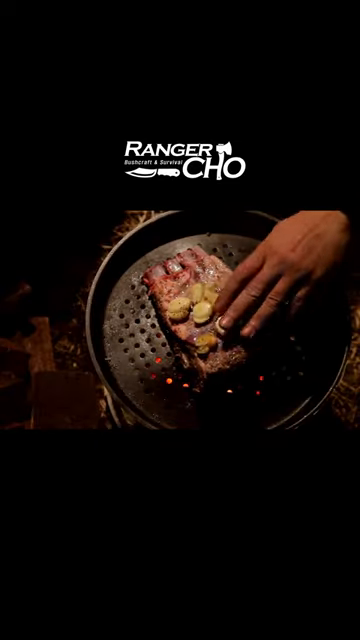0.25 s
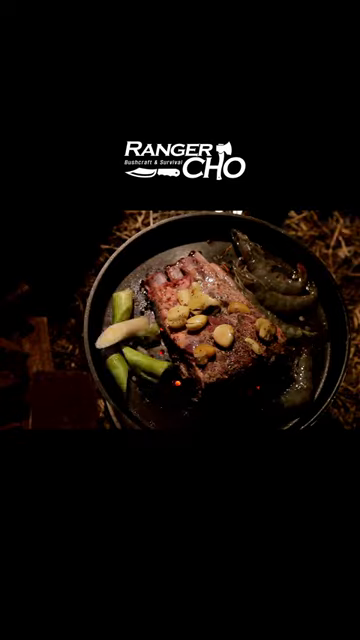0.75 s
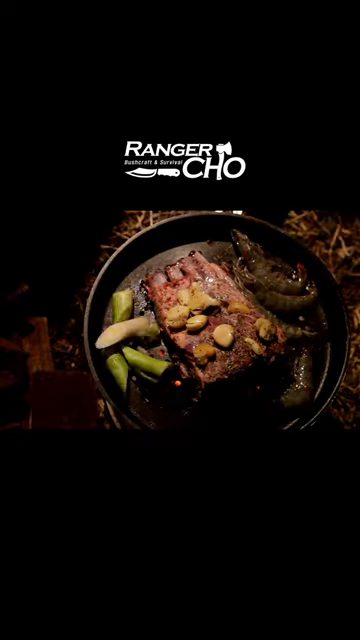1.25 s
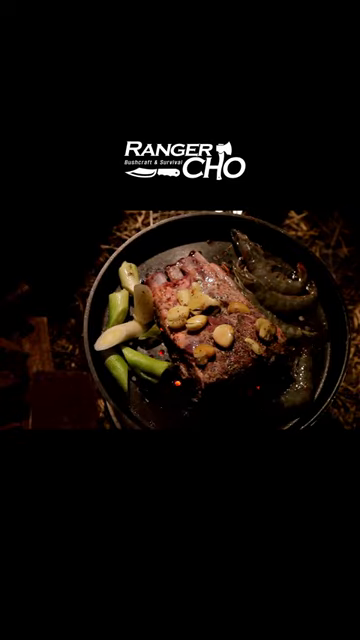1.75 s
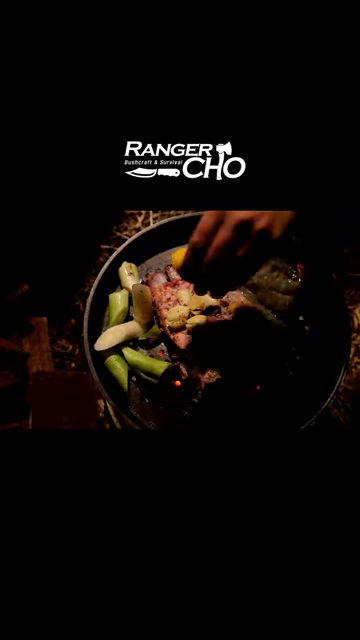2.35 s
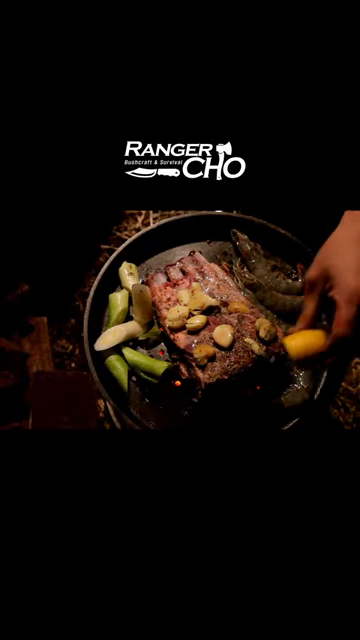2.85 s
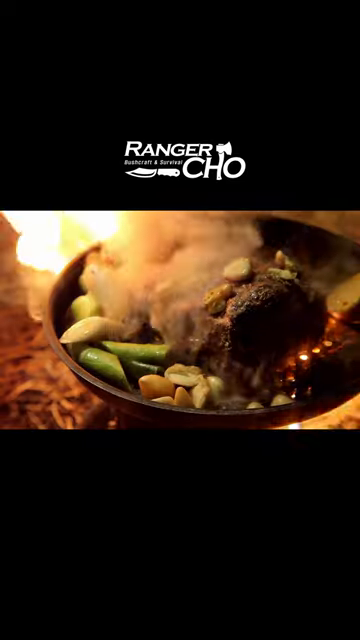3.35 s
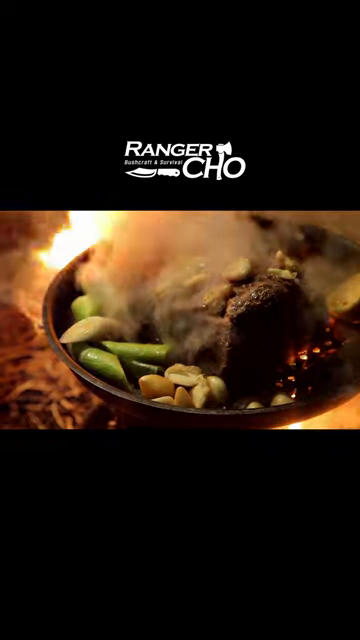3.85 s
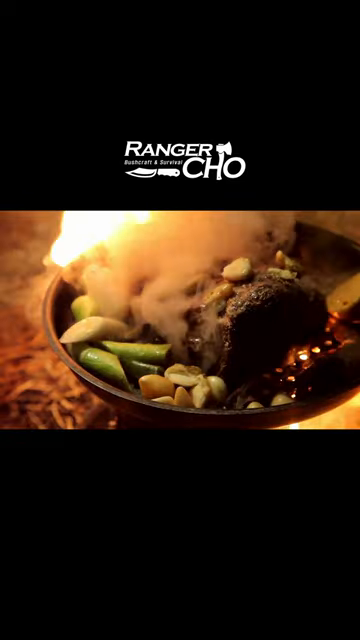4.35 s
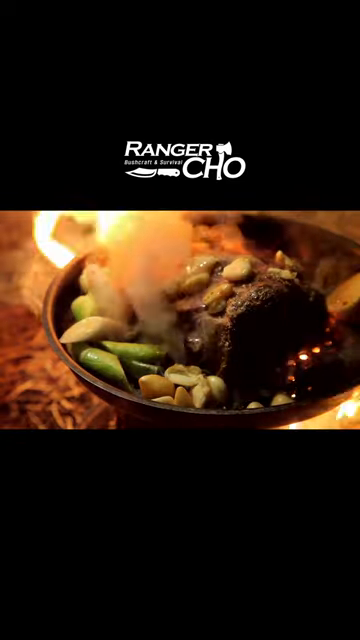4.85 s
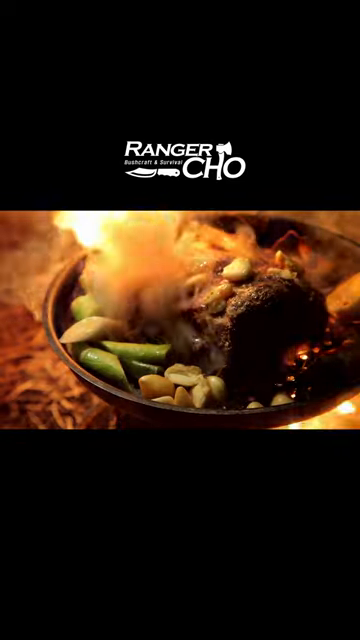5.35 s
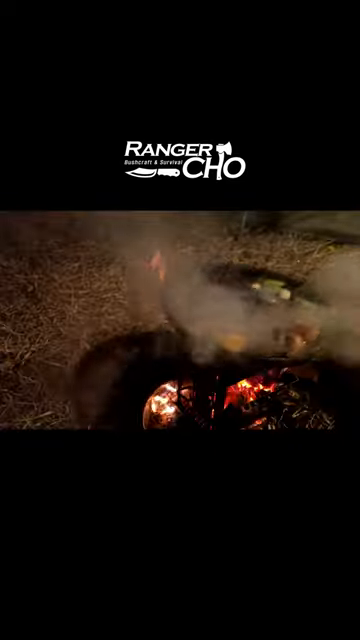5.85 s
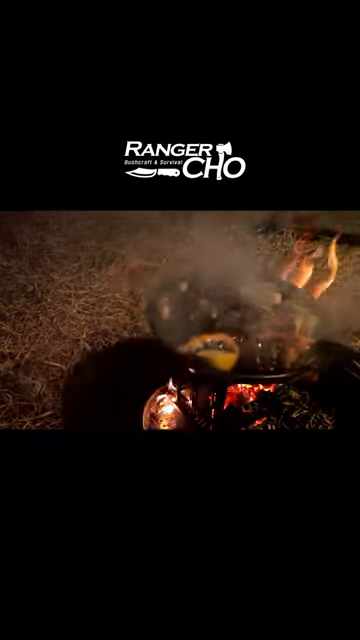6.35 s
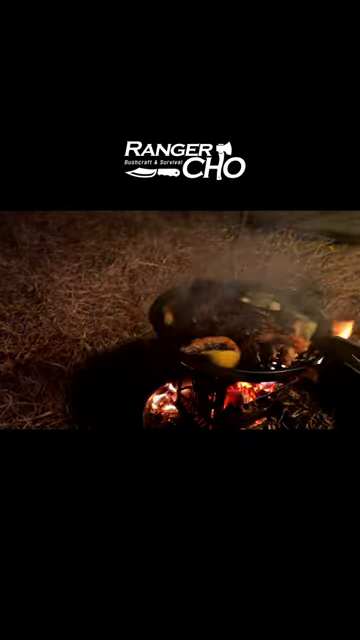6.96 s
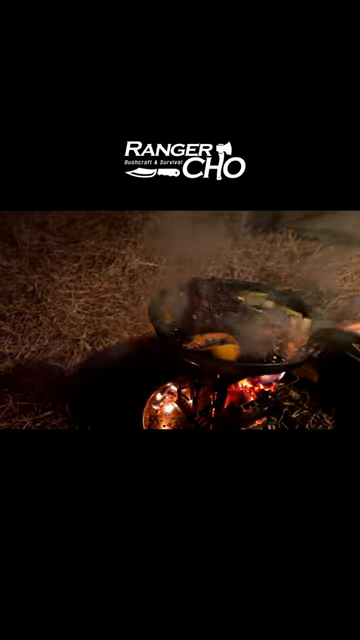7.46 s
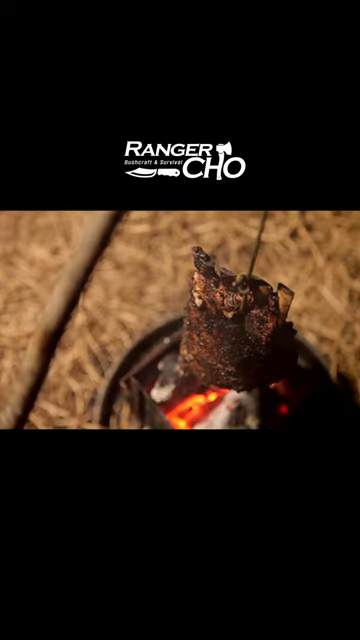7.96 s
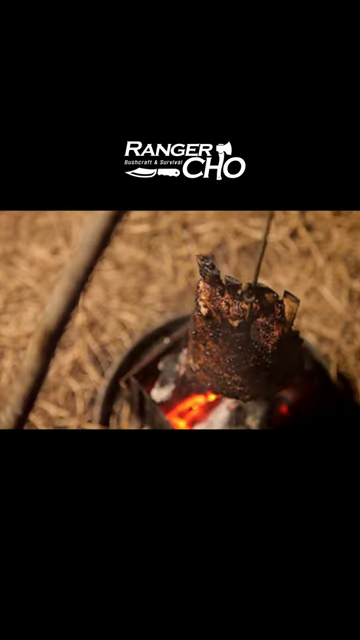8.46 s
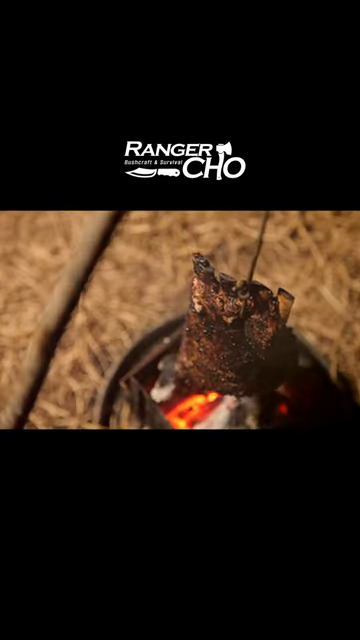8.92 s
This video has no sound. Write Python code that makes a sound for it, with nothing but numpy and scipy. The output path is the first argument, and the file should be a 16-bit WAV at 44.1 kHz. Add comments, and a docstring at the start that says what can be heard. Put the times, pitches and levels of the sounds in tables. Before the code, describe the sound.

Close, bright sizzling with pops of fat and fluttering flames, then a few metal pan knocks and a much fainter hiss.

```python
"""A close, bright sizzle: meat fries on a perforated grill pan over a camp fire at night. Five scenes follow
one another, the scene changing abruptly: two close fries, a flare-up, the pan lifted off and set back, a skewer
over embers. Bursting bubbles act as random impulses: fine ones fizz, larger ones spatter, and fat spits and
pops. Crackle excites the hollows under the pan; knocks and scrapes excite the pan's own modes. Beneath it all,
flames flutter over quiet night air and a faint chorus of insects."""
import sys
import numpy as np
from scipy import signal
from scipy.fft import rfft, irfft
from scipy.io import wavfile

SR = 44100
rng = np.random.default_rng(int(sys.argv[2]) if len(sys.argv) > 2 else 0)


def persist_wave(psi):
    """Save psi, clipped to +-1, as 16-bit WAV."""
    counts = np.round(np.clip(psi, -1, 1) * 32767).astype(np.int16)
    wavfile.write(sys.argv[1], SR, np.atleast_2d(counts).T)


N = 405279

# the five scenes: start_s, end_s
SCENES = [(0, .585), (.585, 3.187), (3.187, 5.79), (5.79, 7.69), (7.69, 9.19)]
# spectrum of the night air: frequency_hz, gain_db
NIGHT_SPECTRUM = [(12, -24), (20, -5), (59, 0), (141, -5), (431, -13.5), (1280, -13.5), (1390, -13),
                  (1510, -17.5), (2120, -21), (2430, -18), (3040, -21), (3400, -23), (3700, -22.5),
                  (15800, -25)]
# far insect chorus: pitch_hz, bandwidth_hz, level_db
INSECT_BANDS = [(2426, 60, -68), (3435, 140, -62)]
# spectrum of the faint hiss that differs between the channels: frequency_hz, gain_db
SIDE_HISS_SPECTRUM = [(18, -37), (30, -11), (209, 13), (1090, 1.5), (1420, -9.5), (5120, -17), (15800, -8)]
# spectrum of the flames: frequency_hz, gain_db
FLAME_SPECTRUM = [(24, -30), (40, 4), (178, 5.5), (286, -4.5), (406, -9.5), (599, -6.5), (1000, -13.5),
                  (1300, -51), (2200, -120)]
# flames licking up: time_s, level_db
FLARE_ENVELOPE = [(3.19, -52), (3.22, -38), (3.32, -43), (3.45, -44), (3.95, -51), (4.3, -50.5),
                  (4.82, -48), (5.26, -54), (5.64, -40), (5.8, -43), (5.9, -45), (6.1, -37), (6.29, -37.5),
                  (6.36, -41), (6.6, -42), (6.91, -43.5), (7.3, -46.5), (7.69, -47)]
# soft low puffs of gas catching and plops of fat: start_s, level_db, centre_hz
PUFFS = [(3.208, -19, 169), (3.213, -18, 437), (3.22, -14, 345), (3.254, -16, 361), (3.39, -28, 145),
         (4.293, -24, 388), (4.418, -26, 167), (4.765, -25, 245), (4.984, -25.5, 161), (5.161, -27, 363),
         (5.192, -26, 221), (5.324, -20, 327), (5.435, -23, 280), (5.473, -24, 317), (5.565, -23, 350),
         (5.597, -18, 315), (5.64, -19, 300), (5.73, -22, 200), (6.085, -27, 99.6), (6.114, -28.5, 105),
         (6.256, -21.5, 110), (6.295, -19, 142), (6.445, -19.5, 165), (6.717, -22, 260), (6.773, -20, 240),
         (7.556, -21.5, 262)]
# vibration modes of the pan: pitch_hz, gain_db, t60_s
PAN_MODES = [(640, -5, .05), (705, 0.1, .09), (850, -5, .05), (991, -3, .07), (1244, -5, .07),
             (1340, -6, .07), (1728, -14, .08), (2285, -10, .12), (2315, -6, .13), (2961, -12, .12)]
# pan against its stand: start_s, clunk_db, clunk_hz, crack_db, ring_db, ring_tilt_db_per_octave
KNOCKS = [(6.446, -8, 900, -13.5, -38, -8), (6.519, -13.5, 800, -26, -33, -1),
          (6.671, -16.5, 815, -45, -39, 1), (6.718, -12, 800, -40, -29, -2),
          (6.736, -7.5, 556, -45, -28, 3.5), (6.774, -14.5, 800, -40, -21, -7),
          (7.065, -27, 708, -23, -46, -5), (7.27, -28, 834, -21.5, -44, -7),
          (7.557, -17, 735, -7, -32, -0.5)]
# pan pushed into place, a jerk and a slide: start_s, length_s, level_db
SCRAPES = [(6.774, 0.019, -30.5), (6.8, 0.283, -38.5)]
# food pushed about on the pan: start_s, length_s, level_db
FOOD_SHIFTS = [(0.612, .015, -42), (0.645, 0.056, -42.5), (0.872, 0.035, -33.5), (0.92, 0.085, -40),
               (1.024, 0.021, -36.5)]
# resonances of the pan loaded with food: pitch_hz, bandwidth_hz, gain_db
LOADED_PAN_MODES = [(423, 73, 2.5), (680, 76, -1.5), (1270, 120, -1), (1850, 52, 0.5), (2100, 35, -1)]
# resonances of the hollows under the pan: pitch_hz, bandwidth_hz, gain_db
HOLLOW_MODES = [(182, 72, 0), (340, 210, 0), (910, 310, 2), (1575, 68, -2.5), (1970, 240, 1.5),
                (2980, 78, 5.5), (4170, 170, -2)]
# fits of sputtering as fat runs onto the coals: start_s, length_s, level_db
SPUTTERS = [(0.8, .3, -45), (2.55, 0.073, -43), (3.207, 0.034, -29), (3.28, 0.069, -27),
            (3.36, 0.066, -32.5), (4.16, 0.093, -38.5), (4.3, 0.12, -33.5), (4.45, .22, -34.5),
            (4.79, 0.078, -38.5), (5.04, 0.37, -41), (5.47, 0.11, -32), (5.6, .09, -29.5),
            (5.7, .085, -34.5), (6.45, 0.051, -43), (6.92, 0.17, -38), (7.1, 0.35, -46.5),
            (7.55, 0.04, -40)]
# dull spits and nudges of food: start_s, level_db, centre_hz
SPITS = [(0.078, -14, 926), (0.611, -22, 430), (0.645, -17, 2160), (0.813, -19, 3000), (0.873, -18, 406),
         (0.894, -16, 1700), (0.896, -18, 500), (1.027, -16.5, 550), (1.112, -14, 2790), (1.198, -14, 2840),
         (1.429, -11, 2610), (1.503, -17, 2640), (1.901, -13, 2900), (2.01, -11.5, 3050), (3.209, -18, 397),
         (3.229, -7.5, 1500), (3.259, -15, 533), (3.305, -9, 2300), (3.345, -8, 2600), (3.419, -4, 2200),
         (3.621, -15, 1890), (3.671, -21, 385), (4.163, -13, 2170), (4.192, -9.5, 2940),
         (4.215, -6.5, 2780), (4.237, -5.5, 3000), (4.301, -7.5, 1500), (4.346, -12, 1900),
         (4.365, -14, 2000), (4.586, -10.5, 1960), (4.669, -14.5, 1090), (4.769, -6.5, 1890),
         (4.817, -12.5, 2300), (4.869, -12, 2970), (4.991, -14, 800), (5.193, -9, 2180), (5.345, -4, 2200),
         (5.784, -10, 2150)]
# sharp pops of fat, and the crack of the pan knocking its stand: start_s, level_db, centre_hz, t60_s
POPS_AND_CRACK = [(0.244, -5, 12300, 0.0071), (0.8344, -7, 10700, .003), (0.919, -9, 10000, .0013),
                  (1.1034, -3.5, 11900, .002), (1.3267, -2, 10800, .0011), (1.4698, -4, 8000, 0.0032),
                  (1.5592, -5, 9450, 0.00082), (1.6728, -5, 11600, .0029), (1.9788, -7, 11500, .0035),
                  (3.3405, -9, 7000, .003), (3.3465, -10, 5000, .003), (3.3745, -7, 6000, .002),
                  (3.3827, -9, 7700, .0057), (3.3894, -10, 7400, .0039), (3.43, -11, 7000, .006),
                  (3.5856, -8, 6400, .0032), (3.8039, -5.5, 6100, .0045), (3.8665, -5.5, 7800, .001),
                  (3.882, -7, 10600, 0.0021), (3.9323, -7, 11700, .0031), (3.9866, -9.5, 7000, .0026),
                  (4.2384, -9, 8200, .0093), (4.3122, -6, 10100, .0035), (4.4005, -5, 7800, .0019),
                  (4.5896, -17, 5500, .0055), (4.6131, -2.5, 8150, 0.0051), (4.71, -6, 8700, .0023),
                  (5.1431, -15, 8350, 0.0037), (5.1529, -5.5, 8700, .0055), (5.4836, -7, 6850, 0.0033),
                  (5.6283, -1, 6800, 0.001), (5.6567, -6, 5900, .0026), (5.8105, -23, 8650, .0012),
                  (6.1212, -27, 6800, .0039), (6.1756, -19, 9100, .0028), (6.1934, -24, 7100, .0037),
                  (6.243, -28, 6100, .0053), (6.307, -18, 9000, .0022), (6.3474, -21, 8900, .0037),
                  (6.3545, -21, 6700, .0034), (6.3674, -17, 8500, .0022), (6.4477, -19, 5170, .01),
                  (6.5208, -11.5, 2780, 0.0072), (6.7222, -8.5, 3750, 0.013), (6.7846, -19, 7200, .0056),
                  (6.9123, -19, 8200, .0036), (6.9596, -15.5, 8900, .012), (7.025, -18, 5560, .006),
                  (7.0728, -10, 9800, .002), (7.0856, -14, 8000, .004), (7.1286, -11, 8000, .0023),
                  (7.2732, -15, 6300, .0077), (7.4057, -19, 6800, .0058), (7.4217, -11, 8400, .0027),
                  (7.4435, 1, 8000, 0.0012), (7.5571, -8, 5470, .0042), (7.5783, -21, 10100, .0057),
                  (7.6726, -18, 9800, .0041), (7.9557, -28.5, 7230, .014), (8.5555, -24, 8500, .0067),
                  (9.138, -27.5, 6000, .01)]
# spectrum of the frying, one list a scene: frequency_hz, gain_db
FRY_SPECTRA = [
    [(880, -34), (1500, -11), (1770, -22), (2340, -10.5), (2850, -18.5), (4060, -9.5), (6910, -6),
     (7770, -1.5), (10300, -3), (12600, -0.5), (15800, -7)],
    [(880, -12.5), (1500, -8), (2180, -1.5), (3430, -1.5), (4180, 1.5), (12800, 2), (13800, 2.5),
     (15800, -7)],
    [(880, -13), (1500, -2), (1690, -6.5), (2140, 1), (2550, -6.5), (2790, 1), (3300, -5), (4260, -1.5),
     (8090, -4.5), (13400, -8), (15800, -12.5)],
    [(880, -32), (1500, -5.5), (1940, -13), (2250, -3), (2480, -3.5), (3140, -6.5), (4350, -1.5),
     (13100, -5), (15800, -11)],
    [(880, -33), (1500, -8), (2990, -7), (3500, 4), (4260, 0.5), (12100, 13), (15800, 9.5)],
]
# bursting bubbles, one row a scene: fizz_per_s, fizz_spread_db, spatter_per_s, spatter_spread_db
BUBBLES = [(14200, 3.0, 4800, -0.5), (11900, 2, 4000, 2.5), (10900, 3.5, 5000, 4.5), (5600, 2.5, 1400, 3),
           (15000, 2.5, 6500, -2)]
# vigour of the fry as the level of its fizz, one list a scene: time_s, level_db
FIZZ_ENVELOPES = [
    [(0.0, -24), (0.22, -23), (0.35, -27), (0.585, -25.5)],
    [(0.585, -29.5), (0.82, -27.5), (1.06, -28.5), (1.41, -26), (1.74, -29), (1.95, -27), (2.2, -22.5),
     (2.55, -23.5), (2.7, -22.5), (2.85, -25), (3.187, -24)],
    [(3.187, -25.5), (3.35, -22.5), (3.5, -27), (3.86, -25.5), (3.91, -30), (4.04, -28.5), (4.14, -27),
     (4.36, -26), (4.6, -26.5), (4.75, -28), (5.1, -28.5), (5.55, -24.5), (5.79, -28)],
    [(5.79, -50), (5.95, -50), (6.3, -46.5), (6.62, -44), (7.02, -35), (7.3, -37.5), (7.69, -39)],
    [(7.69, -59), (7.995, -54), (8.005, -39), (8.035, -37.5), (8.085, -44), (8.14, -44), (8.2, -50),
     (8.9, -52.5), (9.19, -49)],
]
# balance, one row a scene: spatter_db (at mean vigour), spatter_db_per_fizz_db, steady_crackle_db
FRY_BALANCE = [(-37, 0.51, -46), (-34, 1.34, -51.5), (-34.5, 1.6, -45), (-48, 0.49, -58.5),
               (-53.5, 0.33, -46)]

NIGHT_DB, SIDE_HISS_DB = -43.5, -70.5
SPUTTER_RISE_S, SPUTTER_FALL_S = .012, .069
SMALL_POPS_PER_S, SMALL_POP_HZ, SMALL_POP_T60_S = 22, (6500, 11500), (.0011, .0035)
CUTOFF_HZ = 15850


def from_db(db):
    """Amplitude ratio: tenfold for every 20 dB."""
    return 10 ** (np.asarray(db) / 20)


def unit_rms(x):
    """Normalisation to a mean power of 1."""
    return x / np.sqrt(np.mean(x ** 2) + 1e-20)


def envelope(rows):
    """Gain interpolated in decibels between rows (time_s, level_db), silent outside them."""
    time_s, level_db = np.transpose(rows)
    return from_db(np.interp(np.arange(N) / SR, time_s, level_db, left=-200, right=-200))


def swells(events, rise_s, fall_s):
    """Incoherent sources add in power: each event rises, holds, then decays 60 dB in fall_s."""
    t, power = np.arange(N) / SR, np.zeros(N)
    for start_s, length_s, db in events:
        rise = np.clip((t - start_s) / rise_s + 1, 0, 1)
        decay_db = 60 * np.clip(t - start_s - length_s, 0, 9) / fall_s
        power += (rise * from_db(db - decay_db)) ** 2
    return np.sqrt(power)


def colour(x, spectrum):
    """Minimum-phase filtering: folding the cepstrum gives a causal response with this spectrum."""
    size = 4096
    hz, db = np.transpose(spectrum)
    bin_db = np.interp(np.log(np.fft.rfftfreq(size, 1 / SR) + 1), np.log(hz), db)
    cepstrum = irfft(bin_db * np.log(10) / 20)
    cepstrum[1:size // 2] *= 2
    cepstrum[size // 2 + 1:] = 0
    return signal.oaconvolve(x, irfft(np.exp(rfft(cepstrum))))[:len(x)]


def butter(x, hz, kind, order=2):
    """Butterworth filter: a maximally flat passband."""
    return signal.sosfilt(signal.butter(order, hz, kind, fs=SR, output="sos"), x)


def resonate(x, hz, width_hz):
    """Damped resonator with unit gain at its peak."""
    r = np.exp(-np.pi * width_hz / SR)
    feedback = [1, -2 * r * np.cos(2 * np.pi * hz / SR), r * r]
    return signal.lfilter(np.array([1, 0, -1]) * (1 - r * r) / 2, feedback, x + 1e-18)


def drift(rate_hz):
    """Random fluctuation of unit spread: noise low-passed at rate_hz."""
    r = np.exp(-40 * np.pi * rate_hz / SR)   # one step every 20 samples
    slow = signal.lfilter([1], [1, -2 * r, r * r], rng.standard_normal(N // 20 + 2002))[2000:]
    return np.interp(np.arange(N) / 20, np.arange(len(slow)), unit_rms(slow))


def shot_noise(per_s, spread_db, clump_db, clump_hz):
    """Poisson impulses, mostly small and a few large, clumped by a drifting level."""
    sizes = from_db(spread_db * np.minimum(rng.exponential(1, N), 5.2)) * rng.choice([-1, 1], N)
    occurs = rng.random(N) < per_s / SR
    return sizes * occurs * from_db(clump_db * drift(clump_hz))


def bursts(events, relative_width):
    """Band-limited transients: a snap and decaying noise per row (start_s, peak_db, centre_hz, t60_s)."""
    size = 4096
    out, noise = np.zeros(N + size), rng.standard_normal((len(events), size))
    for (start_s, peak_db, hz, t60_s), row in zip(events, noise):
        burst = row * np.exp(-np.arange(size) / SR * np.log(1000) / t60_s)
        burst[0] = 2.4 * np.sign(row[0])   # the snap
        burst = resonate(burst, hz, relative_width * hz)
        at = round(start_s * SR)
        out[at:at + size] += from_db(peak_db) * burst / np.abs(burst).max()
    return out[:N]


def night():
    """Ambient noise: broadband far rumble and rustle, with insects merging into narrow bands."""
    air = from_db(NIGHT_DB) * unit_rms(colour(rng.standard_normal(N), NIGHT_SPECTRUM))
    white = rng.standard_normal(N)
    return air + sum(from_db(db) * unit_rms(resonate(resonate(white, hz, width), hz, width))
                     for hz, width, db in INSECT_BANDS)


def flames():
    """Combustion noise: a low, amplitude-modulated flutter, with puffs that last a few cycles."""
    flutter = colour(rng.standard_normal(N) * from_db(4.1 * drift(rate_hz=30)), FLAME_SPECTRUM)
    puffs = bursts([(s, db, hz, 7.5 / hz) for s, db, hz in PUFFS], relative_width=.43)
    return envelope(FLARE_ENVELOPE) * unit_rms(flutter) + butter(puffs, 470, "low")


def pan():
    """Modal vibration: impact and friction ring the same modes; each knock adds a clunk and a crack."""
    start_s, clunk_db, clunk_hz, crack_db, ring_db, tilt_db = np.transpose(KNOCKS)
    at = np.round(start_s * SR).astype(int)
    roughness = unit_rms(shot_noise(8000, spread_db=4, clump_db=2.7, clump_hz=60))
    friction = swells(SCRAPES, rise_s=.016, fall_s=.07) * roughness
    out = 8.4 * resonate(resonate(friction, 730, 510), 730, 510)   # the grind itself
    for hz, mode_db, t60_s in PAN_MODES:
        force = from_db(mode_db - 28) * friction
        strike_db = ring_db + mode_db + tilt_db * np.log2(hz / 700)
        force[at] += from_db(strike_db + rng.normal(0, 2.2, len(at)))
        r, w = from_db(-60 / (t60_s * SR)), 2 * np.pi * hz / SR
        out += signal.lfilter([0, np.sin(w)], [1, -2 * r * np.cos(w), r * r], force + 1e-18)
    clunk_rows = [(s, db, hz, .025) for s, db, hz in zip(start_s, clunk_db, clunk_hz)]
    clunks = butter(bursts(clunk_rows, relative_width=.74), 1440, "low", order=4)
    cracks = bursts([(s, db, 3500, .018) for s, db in zip(start_s, crack_db)], relative_width=.46)
    return out + clunks + cracks


def shifting_food():
    """Forced vibration: wet friction sets the loaded pan humming."""
    friction = unit_rms(shot_noise(2500, spread_db=5.5, clump_db=3, clump_hz=41))
    hum = sum(from_db(db) * unit_rms(resonate(friction, hz, width)) for hz, width, db in LOADED_PAN_MODES)
    return swells(FOOD_SHIFTS, rise_s=.0071, fall_s=.11) * unit_rms(hum)


def hollows(x):
    """Cavity resonance: the hollows under the pan respond in parallel, with alternating polarity."""
    return sum((-1) ** k * from_db(db) * resonate(x, hz, width)
               for k, (hz, width, db) in enumerate(HOLLOW_MODES))


def crackle():
    """Impulse excitation: fat and coals ring the hollows, dull when faint and bright when strong."""
    steady = sum(envelope([(start, db), (end, db)]) for (start, end), (*_, db) in zip(SCENES, FRY_BALANCE))
    level = np.hypot(steady, swells(SPUTTERS, SPUTTER_RISE_S, SPUTTER_FALL_S))
    ringing = unit_rms(hollows(shot_noise(6000, spread_db=2.5, clump_db=2.8, clump_hz=62)))
    brightness = np.clip(level / from_db(-36.5), 0, 1)
    return level * (butter(ringing, 1640, "low") + brightness * butter(ringing, 2130, "high"))


def spits():
    """Broadband transients: dry cracks, heard directly and through the resonance of the hollows."""
    direct = bursts([(s, db, hz, .011) for s, db, hz in SPITS], relative_width=1.13)
    return .7 * direct + .36 * hollows(direct)


def pops_and_crack():
    """Brief impulses sound bright: sharp pops of fat, and the crack of the pan knocking its stand."""
    # small random pops follow the fizz in level
    fizz = sum(envelope(rows) for rows in FIZZ_ENVELOPES)
    when, size, pitch, length = rng.random((round(SMALL_POPS_PER_S * N / SR), 4)).T
    fizz_db = 20 * np.log10(fizz[(when * N).astype(int)] + 1e-9)
    peak_db = np.minimum(fizz_db + 17, -12.5) + 4 * (2 * size - 1)   # capped, then scattered
    (low_hz, high_hz), (short_s, long_s) = SMALL_POP_HZ, SMALL_POP_T60_S
    centre_hz = low_hz * (high_hz / low_hz) ** pitch
    t60_s = short_s * (long_s / short_s) ** length
    skewer_start_s = SCENES[-1][0]
    small = [row for row in zip(when * N / SR, peak_db, centre_hz, t60_s) if row[0] < skewer_start_s]
    return butter(bursts(POPS_AND_CRACK + small, relative_width=.69), 2300, "high")


def frying():
    """Shot noise of bursting bubbles: small ones fizz in the treble, larger, rarer ones spatter below."""
    out, bubbles = np.zeros(N), np.zeros((4, N))
    for (start, end), row in zip(SCENES, BUBBLES):
        bubbles[:, round(start * SR):round(end * SR) + 1] = np.array(row)[:, None]
    small_per_s, small_spread_db, large_per_s, large_spread_db = bubbles
    small = shot_noise(small_per_s, small_spread_db, clump_db=1.04, clump_hz=200)
    large = shot_noise(large_per_s, large_spread_db, clump_db=1.56, clump_hz=50)
    sputter = from_db(-1) * swells(SPUTTERS, SPUTTER_RISE_S, SPUTTER_FALL_S)
    surge = from_db(.7 * drift(rate_hz=7.2))   # the fry surges and slackens
    for (start, end), levels, spectrum, balance in zip(SCENES, FIZZ_ENVELOPES, FRY_SPECTRA, FRY_BALANCE):
        now = slice(round(start * SR), round(end * SR))
        spatter_db, exponent, _ = balance
        fizz_gain = envelope(levels)[now] * surge[now]
        vigour = fizz_gain / np.exp(np.log(fizz_gain).mean())   # relative to the scene's geometric mean
        spatter_gain = np.hypot(from_db(spatter_db) * vigour ** exponent, sputter[now])
        # large bubbles reach the treble too
        both = .92 * small[now] / small[now].std() + .32 * large[now] / large[now].std()
        out[now] += fizz_gain * unit_rms(butter(colour(both, spectrum), 4520, "high"))
        out[now] += spatter_gain * unit_rms(butter(colour(large[now], spectrum), 3830, "low"))
    return out


def scene():
    """Superposition: all sources are centred, except a faint hiss in antiphase between the channels."""
    mid = frying() + crackle() + spits() + pops_and_crack() + shifting_food() + pan() + flames() + night()
    side = from_db(SIDE_HISS_DB) * unit_rms(colour(rng.standard_normal(N), SIDE_HISS_SPECTRUM))
    return np.array([mid + side, mid - side])


def record(dry):
    """Clipping and band limiting: peaks stop at full scale, then a steep low-pass cuts the top."""
    low_pass = signal.ellip(12, .3, 60, CUTOFF_HZ, fs=SR, output="sos")
    return signal.sosfilt(low_pass, np.clip(dry, -1, 1))


dry = scene()
out = record(dry)
persist_wave(out)
```